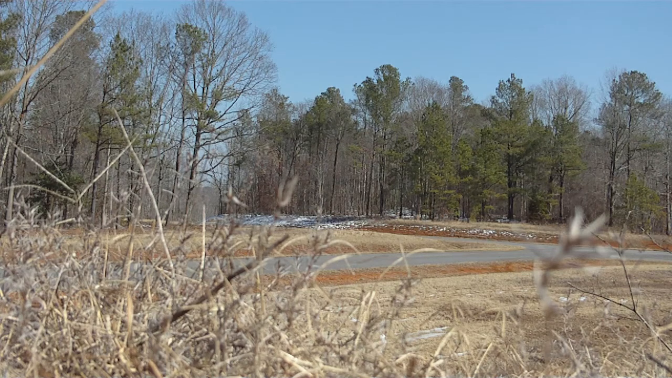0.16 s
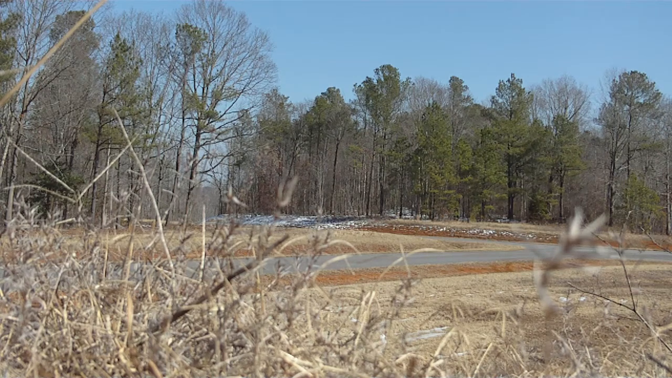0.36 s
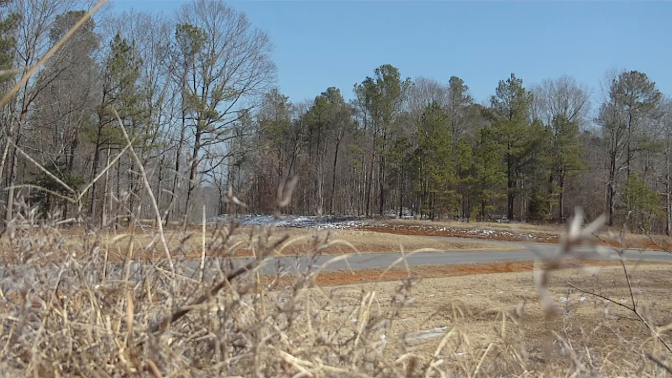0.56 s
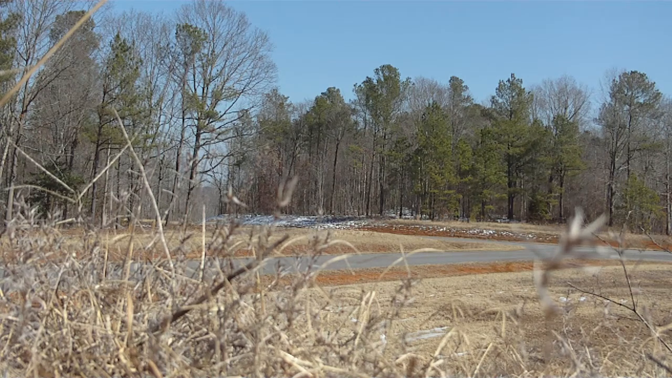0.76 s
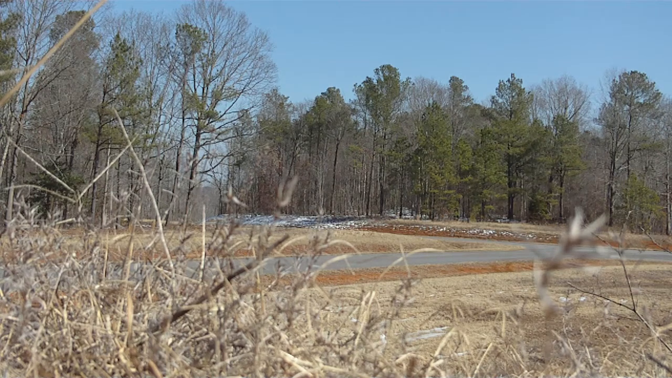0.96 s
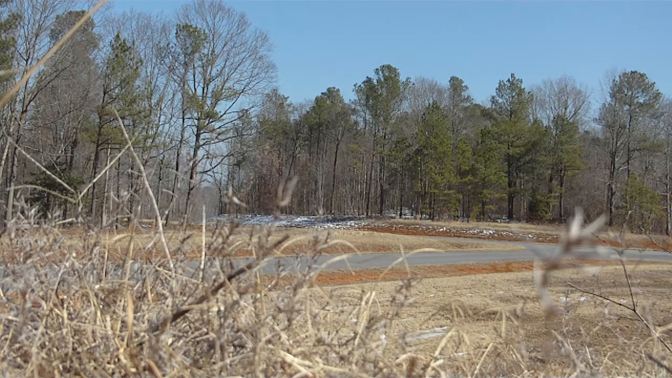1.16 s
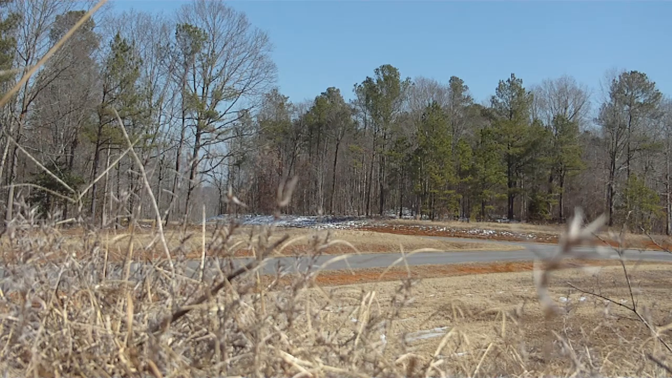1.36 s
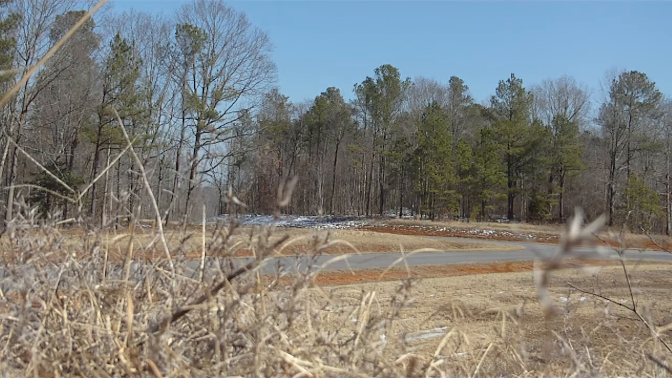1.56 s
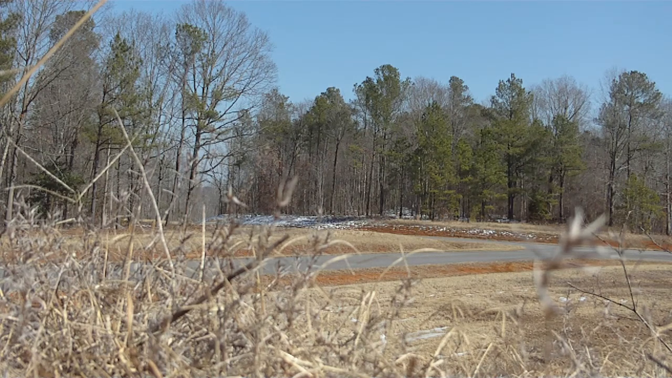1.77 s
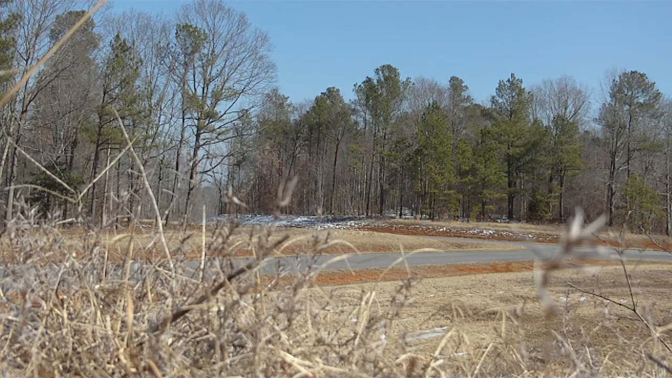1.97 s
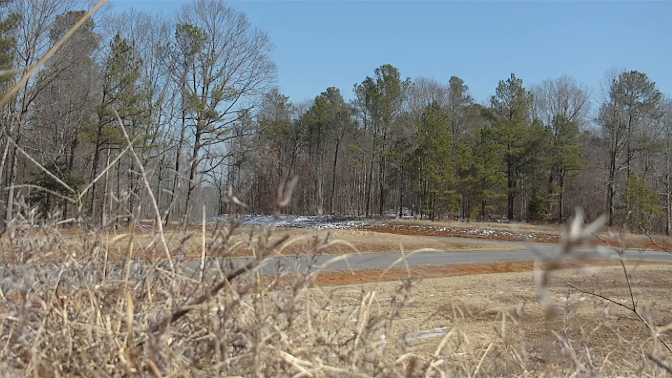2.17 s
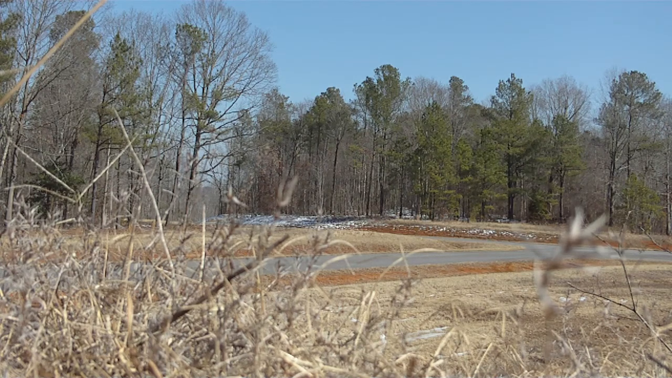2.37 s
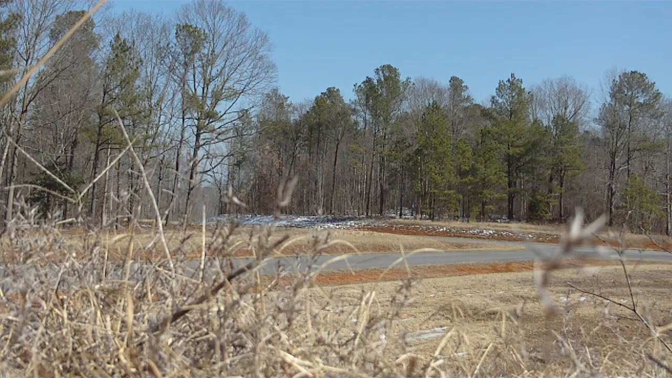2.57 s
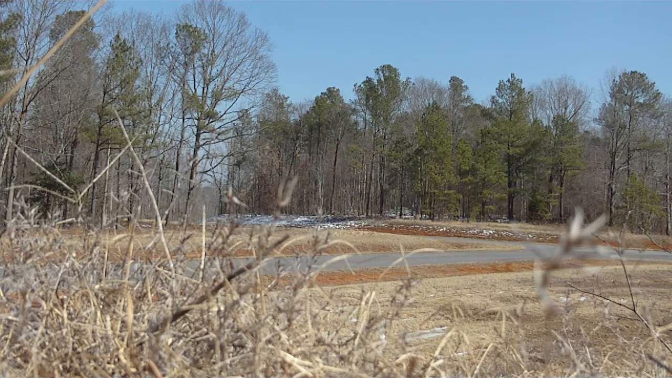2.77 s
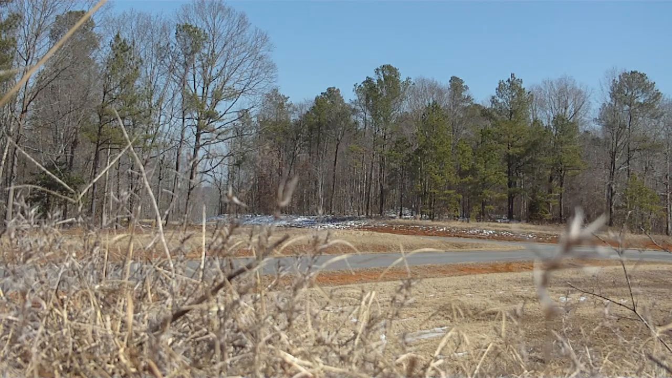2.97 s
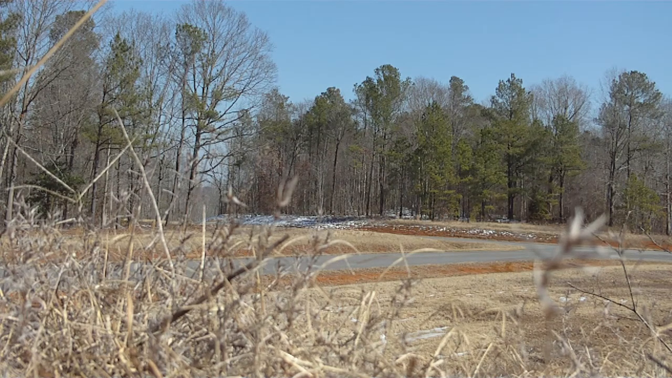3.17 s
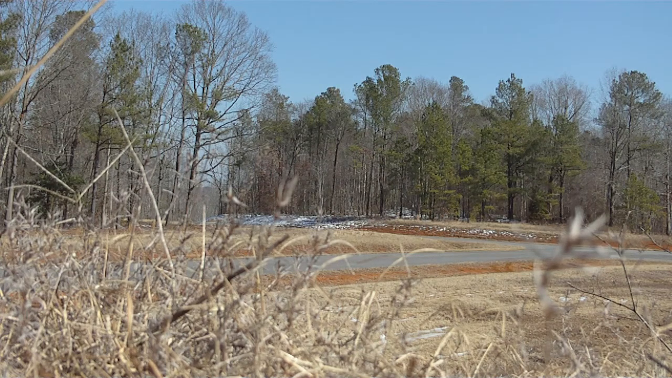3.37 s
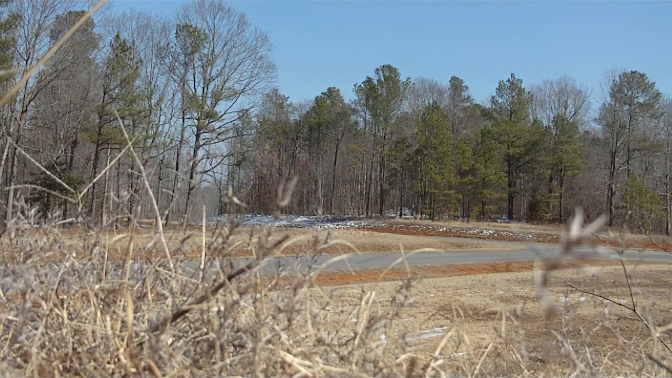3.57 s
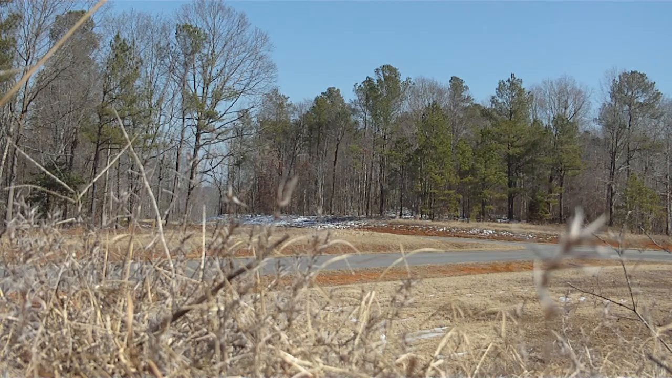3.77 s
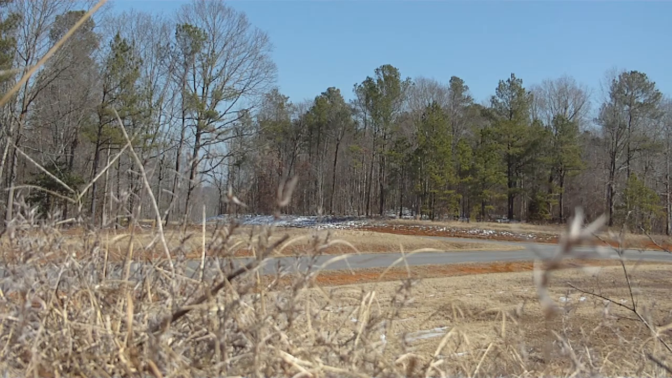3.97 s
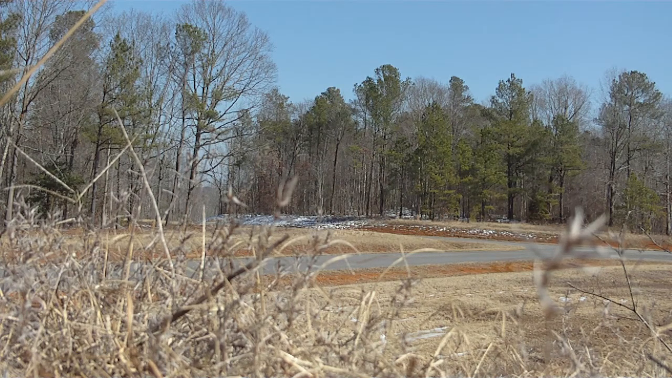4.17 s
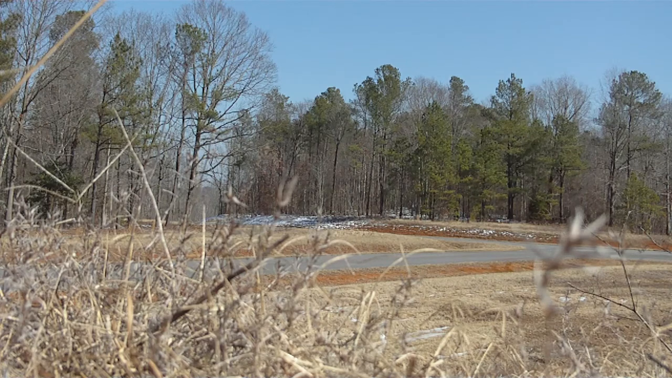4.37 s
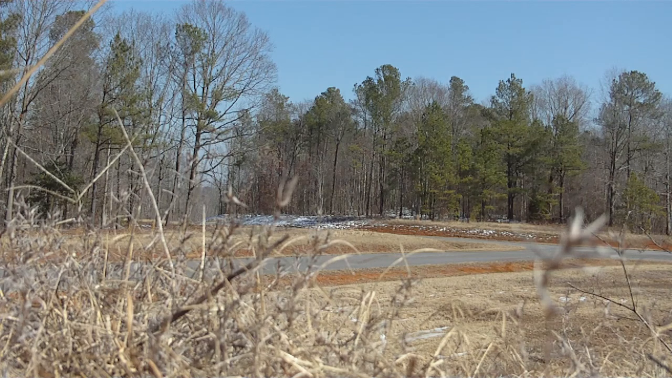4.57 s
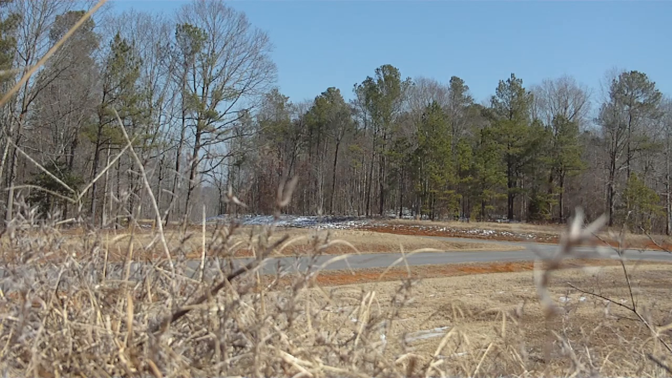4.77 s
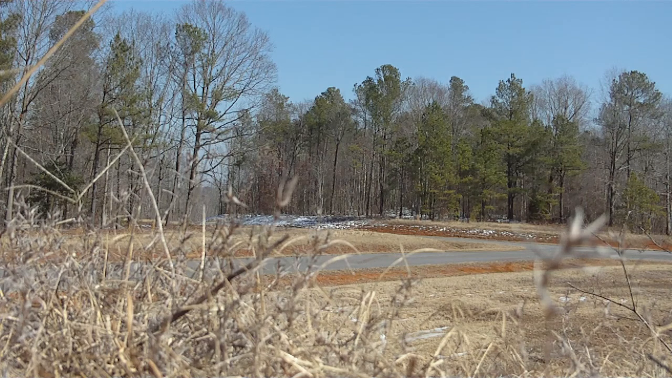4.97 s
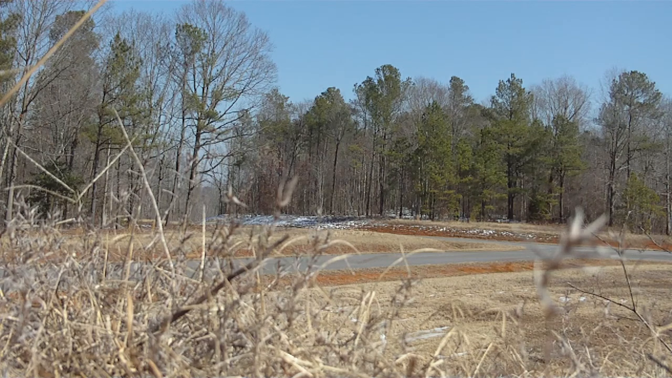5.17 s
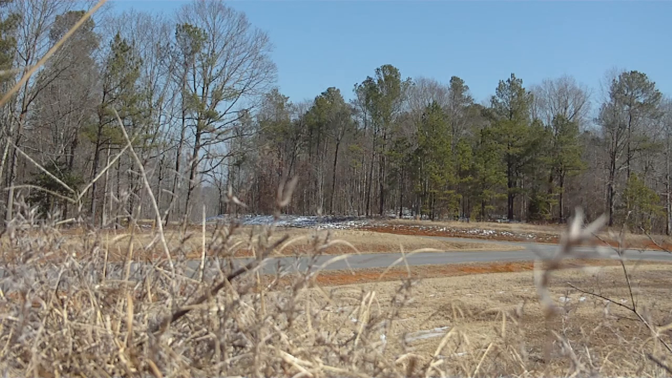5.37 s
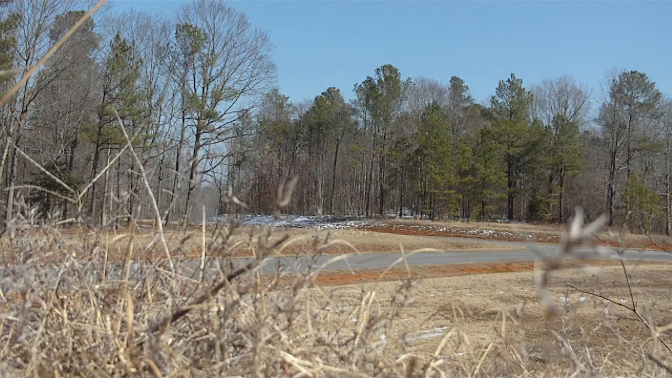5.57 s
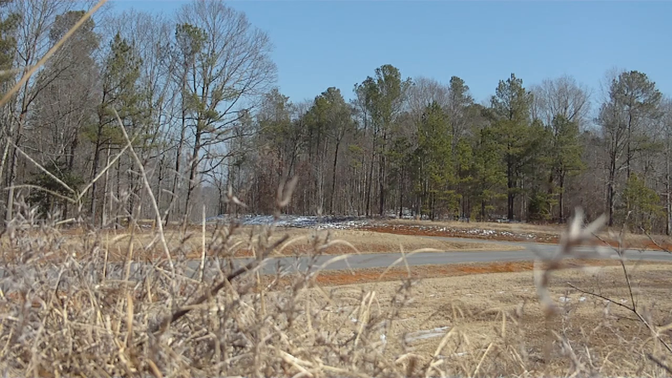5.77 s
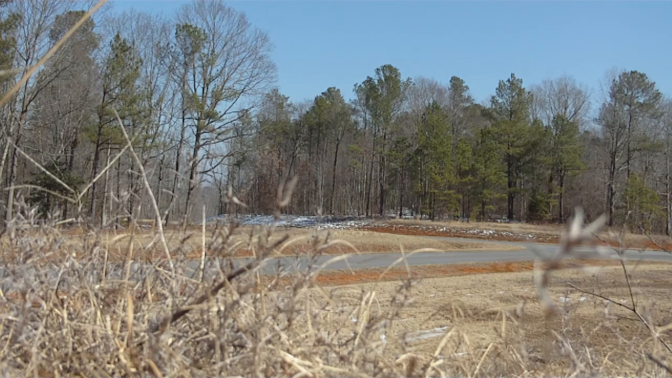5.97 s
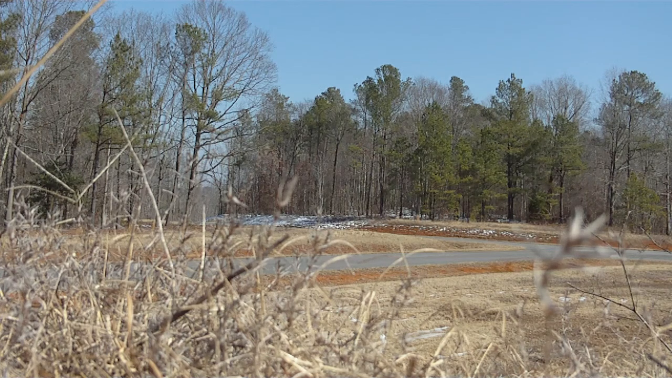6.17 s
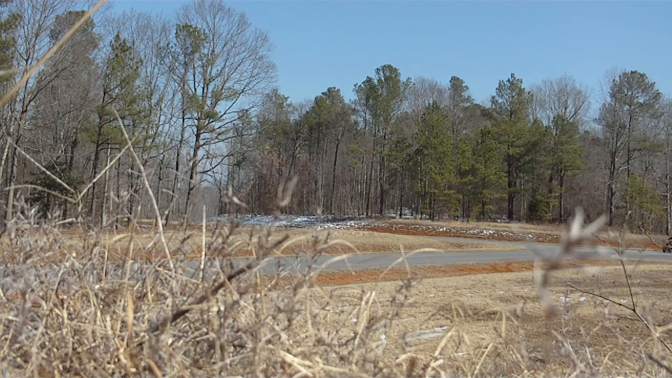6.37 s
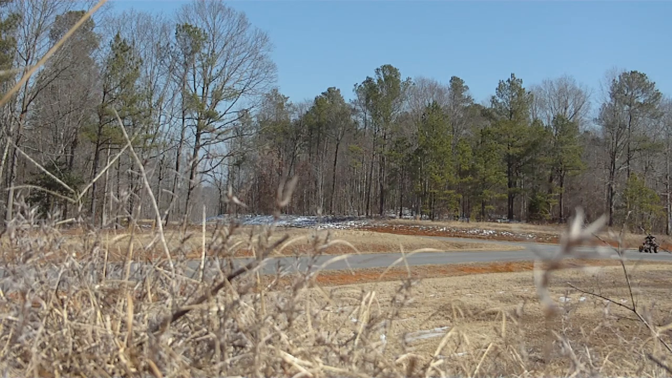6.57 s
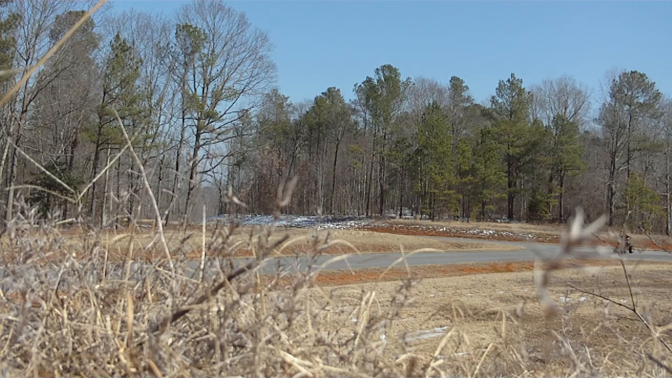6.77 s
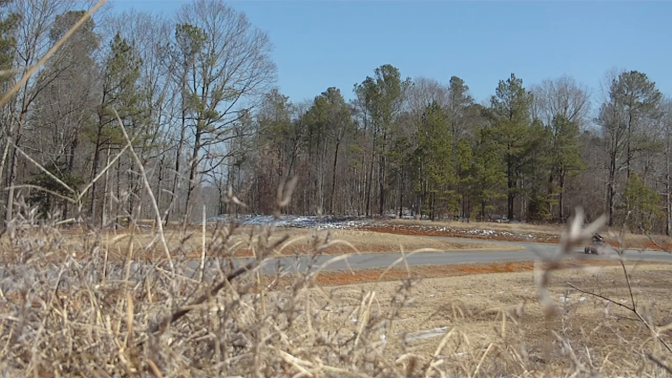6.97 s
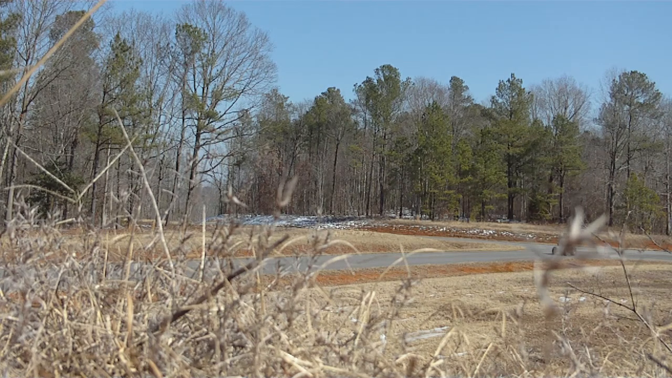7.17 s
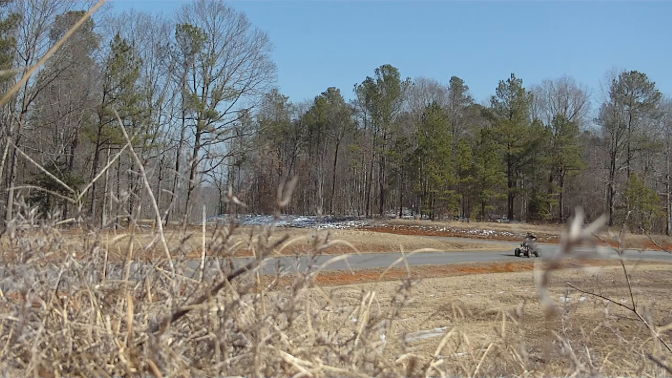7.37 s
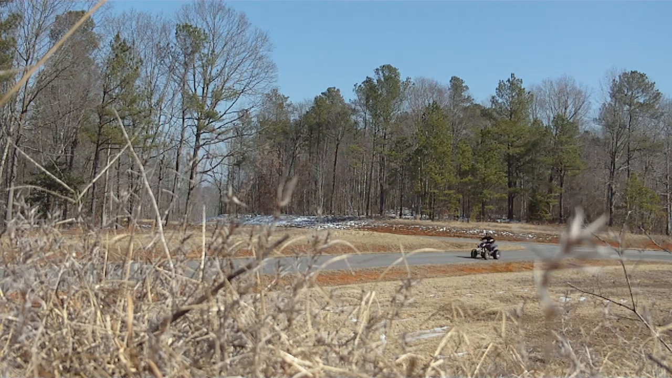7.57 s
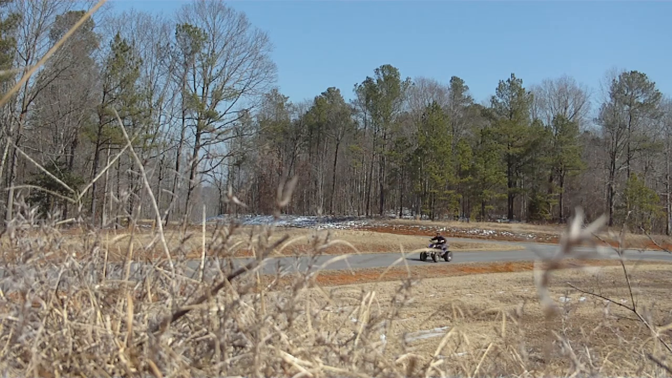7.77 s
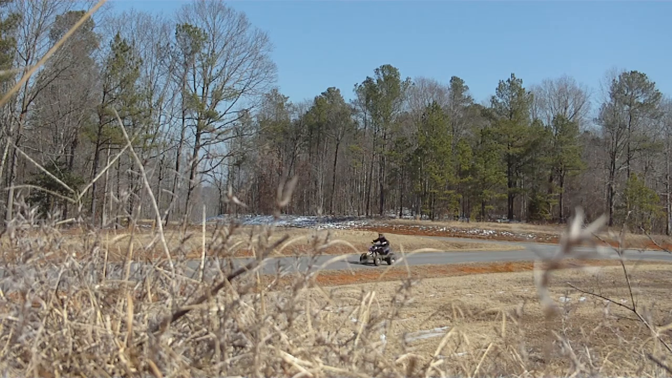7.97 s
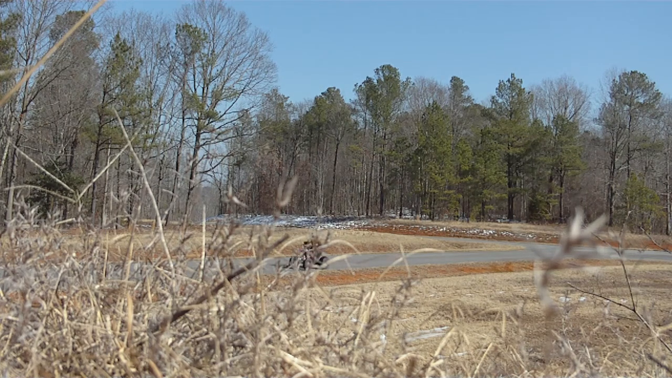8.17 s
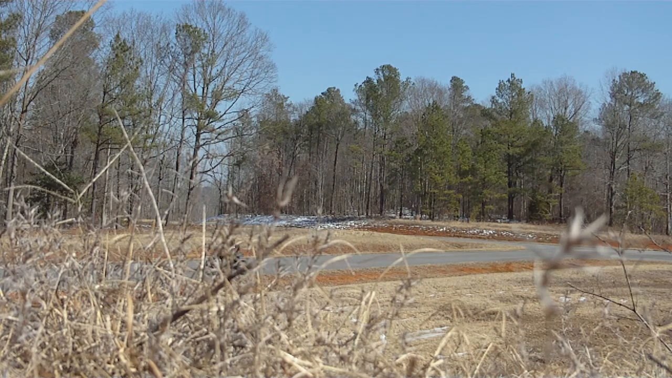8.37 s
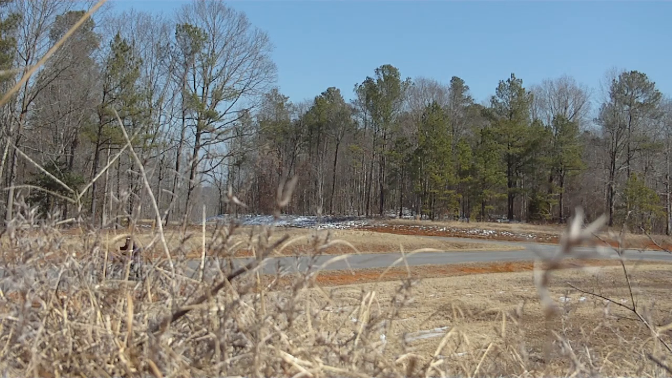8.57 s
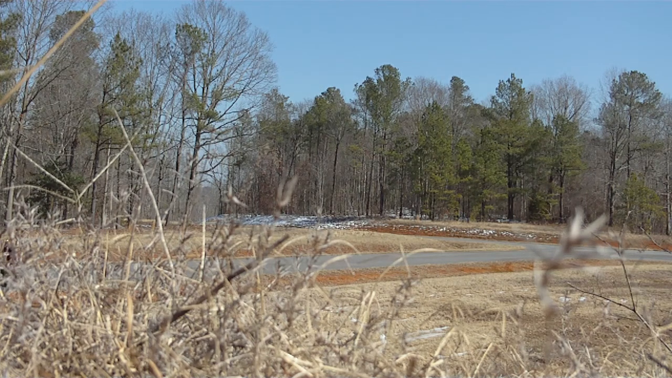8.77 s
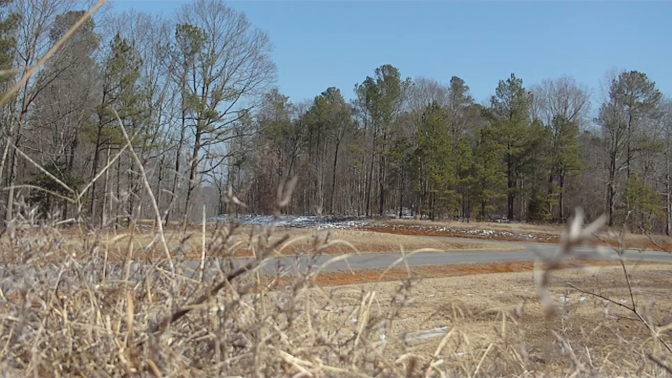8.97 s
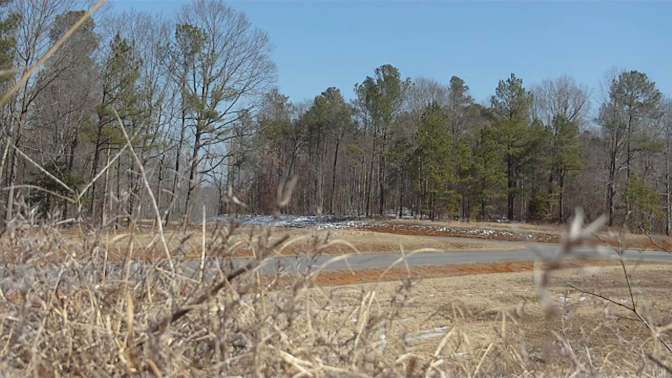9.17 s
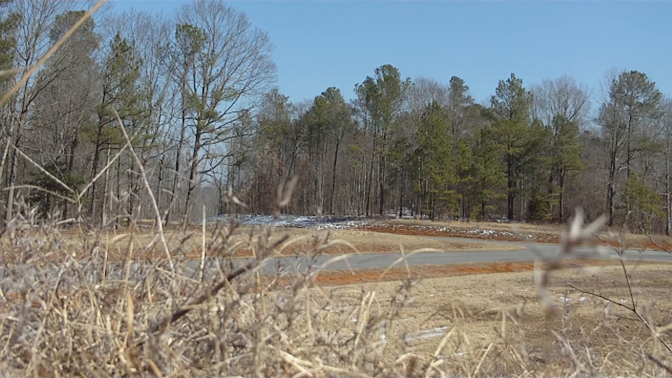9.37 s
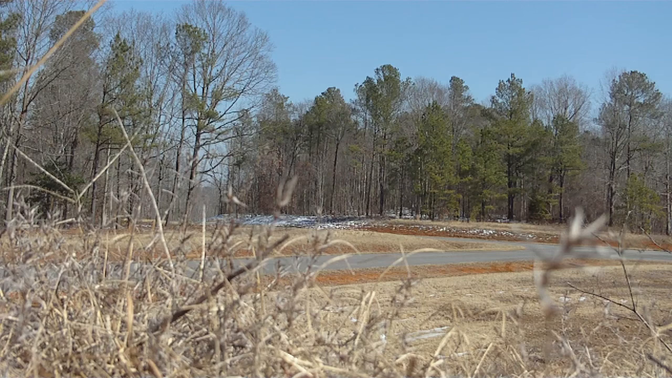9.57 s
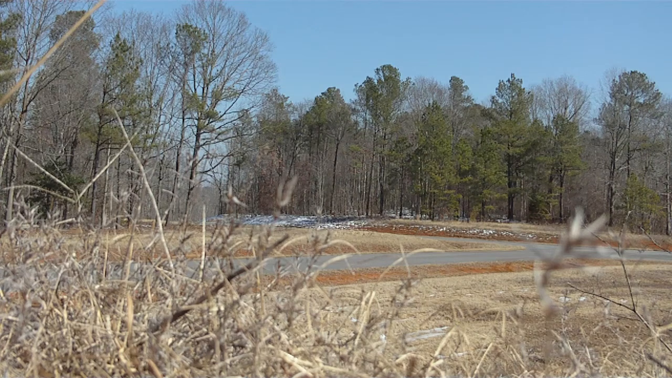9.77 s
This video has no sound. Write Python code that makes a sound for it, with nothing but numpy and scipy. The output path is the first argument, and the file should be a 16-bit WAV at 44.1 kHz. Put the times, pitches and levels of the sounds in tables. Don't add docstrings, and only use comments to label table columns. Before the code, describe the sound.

Distant quad engine buzz shifts up early, steadily grows with knobbly tyre hum and clatter, then passes loudly and drops in pitch at the end.

```python
import sys
import numpy as np
from scipy import signal
from scipy.fft import rfft, irfft
from scipy.io import wavfile

SR = 44100
rng = np.random.default_rng(int(sys.argv[2]) if len(sys.argv) > 2 else 0)


def rack_gain(trim_db):
    fader = np.asarray(trim_db, float)
    return 10 ** (fader / 20)


def generate_wav(signal):
    frames = np.transpose(np.atleast_2d(signal))
    scaled = np.clip(frames, -1, 1) * 32767
    pcm = np.round(scaled).astype(np.int16)
    wavfile.write(sys.argv[1], SR, pcm)


N = 433062

# f/Hz, level/dB per Hz
AIR_COLOUR = [(10, -32), (22, 3), (40, -1), (65, -1.5), (110, 0), (200, -13), (400, -54.5)]
AIR_DB = -41
# t/s, level/dB, length/s
GUSTS = [
    (1.5, -1, 0.45),
    (4.2, 4, .3),
    (4.85, -3, .12),
    (5.2, 8, .15),
    (5.75, 9, .2),
    (7.85, -5, .25),
    (8.5, -5, .3),
]
# start f/Hz, end f/Hz, start level/dB, end level/dB
DRONES = [
    (61.6, 56, -39.5, -45.5),
    (70.9, 67, -37.5, -48.5),
    (102.5, 77, -46, -45),
]
# t/s, f/Hz, level/dB
GEAR_HUM = [
    (0, 270, -43),
    (.6, 277, -38.5),
    (.8, 268, -41.5),
    (1.1, 236, -60),
]
# f/Hz, level/dB
WHINES = [(7865, -76), (11090, -69.5)]
LEFT_DB = -9.1
HISS_LEFT_DB, HISS_RIGHT_DB = -54, -57.5

# t/s, level/dB
NEARNESS = [(0, -16), (1.0, -15), (1.8, -14), (2.6, -12.5), (3.2, -11.5), (4.2, -10.5), (5.0, -7.5),
            (5.5, -4.5), (6.1, -4), (6.7, -2), (7.3, -1), (7.9, -0.5), (8.3, 0.4), (8.8, -0.2)]
# t/s, shut/0-1
THROTTLE = [(0, 0), (.42, 0), (.5, 0.6), (.57, 1.2), (.63, 0), (.7, 0.14), (8.82, 0.02), (8.87, 0.53),
            (9.04, 1.05), (9.2, 0.65), (9.44, 0.61), (9.58, .2), (9.82, 0.55)]
# t/s, uneven firing/0-1, close colour/0-1
ENGINE_STATE = [(0, 0.42, 0.05), (4.5, 0.37, 0.14), (6.0, 0.08, 0.01), (8.1, 0.18, 0.15), (8.4, 0.26, 0.25),
                (8.83, 0.3, 0.4), (8.87, 0.3, 0.56), (9.35, .6, 0.9), (9.82, 0.3, 1)]
# t/s, level/dB
SCREEN = [(0, -29), (4.6, -28), (5.95, -22), (6.1, -3), (6.2, -6.5), (6.4, -10.5), (6.75, -5.5), (7.05, 2),
          (7.22, -2.5), (7.4, -1), (7.62, 2.5), (7.8, -1.5), (8.05, -1.5), (8.4, -4.5), (8.8, -1.2)]
FINS_SCREENED = 0.026
UPSHIFT_S, UPSHIFT_LASTS_S = .74, 0.2
LOW_GEAR_SECOND_DB, LOW_GEAR_TREAD_DB = -13.5, -23
ABREAST_S, ABREAST_TAKES_S = 8.845, 0.043
AWAY_S, AWAY_TAKES_S = 9.29, 0.34
# t/s, level/dB,
# length/s
RUTS = [(0.677, 3, 0.026), (0.978, 2, 0.061), (5.55, -2, 0.15), (7.11, 1.5, 0.041), (7.6, -1, 0.047),
        (7.99, 3, 0.034), (8.018, -5.5, .015), (8.26, -1, .03), (8.82, -1, 0.025), (8.9, 0, 0.028),
        (9.16, 1.5, 0.017), (9.234, 2.5, 0.031), (9.52, 3, 0.15)]

CHAIN_LAYER = (-50, -0.27, -2.8, 8.5, -2)
# f/Hz, level/dB per Hz
HISS_FAR = [(2650, -9), (4500, 0.5), (5670, -4), (6110, -10), (6490, 5), (7510, 4.5), (8560, -8),
            (9510, -7.5), (11000, -19), (14300, -48), (22000, -120)]
# f/Hz, level/dB per Hz
HISS_CLOSE = [(2650, -45), (4500, -10), (4740, -14), (5320, 2.5), (5570, 5.5), (6420, -7.5), (7650, 0),
              (8500, -15), (11000, -21), (14300, -54), (22000, -120)]
HISS_LEAD = 1.5

# t/s, f/Hz
TREAD_RATE = [(0, 222.8), (1.4, 227), (2.2, 224), (3.4, 228.9), (3.8, 228.2), (4.3, 229.4), (5.0, 231.7),
              (5.6, 236.4), (5.8, 235.6), (6.05, 232.0), (6.8, 238.1), (7.55, 241), (8.55, 245.6),
              (8.8, 244.4), (8.9, 238.6), (9.2, 226.7), (9.82, 207.6)]
REAR_RATIO = 1.46
FRONT_TREAD = [
    (-34, 0.35, 0.1, 5.4, -1.5),
    (-33, 2.4, 0.1, 1.8, 1),
    (-36.5, 1.39, 0.1, 9.4, 2.5),
]
REAR_TREAD = [
    (-46.5, 1.48, 0.1, 17.2, -3.5),
    (-39.5, 1.9, 0.1, 8.7, 2.5),
    (-60.5, 2.4, 0.1, 2.5, 20),
]
# f/Hz, width/Hz, lift/dB
TYRE_WALL = [(232, 4.2, 2.5), (303, 5.7, 10), (337.7, 3.6, 11), (411, 8, 5), (466.6, 6.5, 5),
             (491, 4.6, 4.5), (659.3, 26, 6), (721, 16.6, 3)]
# t/s, level/dB, length/s
SURFACE = [(1.1, -1.5, 0.26), (2.15, -2, 0.17), (2.9, -2.5, .3), (4.9, -1.5, .3), (5.75, 2.5, .25),
           (6.7, -1, .1), (7.15, 2.5, .12), (7.5, 3, .2), (8.0, 1, .1), (8.5, -3.5, 0.27), (8.79, -6, 0.08),
           (9.36, -1.5, 0.086), (9.5, 1.5, 0.04)]
SONG_FEELS_SURFACE = 0.73
ROAD_LAYER = (-41.5, 0.82, 1, 7, 2.5)
# f/Hz, level/dB per Hz
ROAR_FAR = [(25, -29), (60, -19), (110, 1.5), (185, 1), (300, -0.5), (450, 4), (600, -1), (730, -3),
            (850, -8), (1100, -16.5), (1600, -48)]
# f/Hz, level/dB per Hz
ROAR_CLOSE = [(25, 2), (60, -8), (110, 3), (185, -7), (300, 6.5), (450, 5), (600, 1.5), (730, 6.5),
              (850, -7.5), (1100, -10), (1600, -60)]

GEAR_TEETH = 11, 16, 18, 22, 18, 20, 20, 13, 14, 16
# t/s, level/dB, length/s
GEAR_RINGS = [(12, -34, 0.07), (8.94, -36, .06), (9.03, -33, 0.051), (9.0, -34, 0.046), (9.2, -35, .06),
              (9.2, -32, 0.062), (9.36, -32, 0.073), (9.35, -30.5, .07), (9.44, -33, .09),
              (9.66, -34.5, 0.22)]
CASES_LAYER = (-39, 0.92, -0.8, 7, -4.5)
# f/Hz, level/dB per Hz
CASES_FAR = [(500, -37), (850, -9.5), (1030, -1), (1200, 7), (1560, 7), (1660, 6.5), (2000, -7.5),
             (2600, -20), (4400, -120)]
# f/Hz, level/dB per Hz
CASES_CLOSE = [(500, -22), (850, -9), (1060, -12), (1370, 0.5), (1520, 0), (1650, 5), (2000, -9),
               (2600, -47), (4400, -120)]
FINS_LAYER = (-37, 1.33, -0.4, 6.5, -9.5)
# f/Hz, level/dB per Hz
FINS_FAR = [(1120, -65), (1900, -1), (2410, 6), (2970, -1), (3350, -15.5), (3970, -11.5), (4600, -33),
            (5980, -54), (10100, -120)]
# f/Hz, level/dB per Hz
FINS_CLOSE = [(1120, -47), (1900, -70.5), (2150, 2.5), (2370, 10.5), (2700, 2), (3300, 1.5), (4600, -18.5),
              (5980, -63), (10100, -120)]
# t/s, level/dB
KNOCK_SHARE = [(0, -17), (4.5, -14), (6.2, -10), (8.8, -8.5), (8.9, -8), (9.82, -6)]

# t/s, f/Hz
FIRING = [(0, 150.3), (.57, 152.4), (.68, 160.9), (.82, 135.8), (.92, 129.4), (1.05, 127.6), (5.0, 129.6),
          (5.35, 130.8), (5.74, 136.9), (6.1, 134.2), (6.55, 131.9), (7.43, 135.4), (8.5, 137.3),
          (8.82, 136.3), (8.96, 132.2), (9.11, 125.2), (9.5, 117.0), (9.82, 108.2)]
# t/s, jump/Hz, settling/s
FLARES = [
    (6.2, 1.2, .1),
    (7.46, 3.9, .13),
    (9.14, 6, .25),
    (9.3, 3, .08),
]
EXHAUST_ORDERS = [
    (-17, 0.97, -15.5, 2.2, -1.5),
    (-21, 0.99, 1.5, -8, 2.5),
    (-26, 1.69, -16, -5, 8.5),
    (-35.5, 1.09, -13, -6, 2.5),
]
# f/Hz, width/Hz, lift/dB
PIPE = [(264.3, 8.8, 4), (407, 4.9, 2), (532.8, 14, 7.5)]


def rms_one(x):
    return x / np.sqrt(np.mean(np.abs(x) ** 2) + 1e-20)


def in_time(rows):
    s, *columns = np.transpose(rows)
    return [np.interp(np.arange(N) / SR, s, c) for c in columns]


def at_hz(points, hz):
    point_hz, point_db = np.transpose(points)
    return np.interp(np.log(hz + 1e-9), np.log(point_hz), point_db)


def ramp(start_s, takes_s):
    return np.clip((np.arange(N) / SR - start_s) / max(takes_s, .005), 0, 1)


def bells_db(rows):
    t = np.arange(N) / SR
    return sum(db * np.exp(-((t - s) / max(length, .005)) ** 2) for s, db, length in rows)


def lift_db(resonances, hz):
    return sum(db * np.exp(-((hz - centre) / max(width, 1)) ** 2) for centre, width, db in resonances)


def level_db(layer):
    near_db, share, shut_db, abreast_db, away_db = layer
    out = near_db + share * in_time(NEARNESS)[0] + shut_db * in_time(THROTTLE)[0]
    return out + abreast_db * ramp(ABREAST_S, ABREAST_TAKES_S) + away_db * ramp(AWAY_S, AWAY_TAKES_S)


def drift(rate):
    r = np.exp(-80 * np.pi * max(rate, .05) / SR)
    slow = signal.lfilter([1], [1, -2 * r, r * r], rng.standard_normal(N // 40 + 2002))[2000:]
    return np.interp(np.arange(N) / 40, np.arange(len(slow)), rms_one(slow))


def turns(hz):
    return 2 * np.pi * np.cumsum(hz) / SR


def partial(phase, rough, rate):
    rough = np.clip(rough, 0, 1)
    wander = (drift(rate) + 1j * drift(rate)) / np.sqrt(2)
    start = np.exp(2j * np.pi * rng.random())
    strength = np.sqrt(1 - rough) + np.sqrt(rough) * wander
    return np.sqrt(2) * np.real(strength * start * np.exp(1j * phase))


def coloured(x, far, close, closeness):
    hz, wide = np.fft.rfftfreq(N, 1 / SR), rfft(x)
    a, b = [rms_one(irfft(wide * rack_gain(at_hz(shape, hz)), N)) for shape in (far, close)]
    mix = np.clip(closeness, 0, 1)
    return ((1 - mix) * a + mix * b) / np.sqrt(1 - mix * (1 - mix))


def open_air():
    air_db = AIR_DB + np.linspace(2.5, -5.0, N) + bells_db(GUSTS) + 0.85 * drift(6.0)
    return rack_gain(air_db) * coloured(rng.standard_normal(N), AIR_COLOUR, AIR_COLOUR, 0)


def far_machinery():
    out = np.zeros(N)
    for hz, end_hz, db, end_db in DRONES:
        tone = partial(turns(np.linspace(hz, end_hz, N)), .12, rate=1.5)
        out = out + rack_gain(np.linspace(db, end_db, N)) * tone
    return out


def low_gear_hum():
    hum_hz, hum_db = in_time(GEAR_HUM)
    return rack_gain(hum_db) * partial(turns(hum_hz), .8, rate=9)


def chain_hiss(rate_hz, hiss_db, close):
    pulse = 1 + 0.16 * np.cos(turns(rate_hz))
    flutter_db = 1.65 * drift(1.5) + 1.3 * drift(30)
    noise = rng.standard_normal(N) * pulse * rack_gain(flutter_db)
    return rack_gain(hiss_db) * coloured(noise, HISS_FAR, HISS_CLOSE, HISS_LEAD * close)


def tread_song(wheel, levels_db, blur):
    return sum(rack_gain(db) * partial((k + 1) * wheel, blur, rate=6.5 + 3.3 * k) for k, db in enumerate(levels_db))


def tyre_roar(roar_db, close):
    noise = rng.standard_normal(N) * rack_gain(0.67 * drift(3.7))
    return rack_gain(roar_db + 10.5) * coloured(noise, ROAR_FAR, ROAR_CLOSE, close)


def tyres(roar_db, close, low_gear):
    knob_hz, = in_time(TREAD_RATE)
    wheel = turns(knob_hz)
    first, second, third = [level_db(row) + lift_db(TYRE_WALL, (k + 1) * knob_hz)
                            for k, row in enumerate(FRONT_TREAD)]
    front_db = [first + LOW_GEAR_TREAD_DB * low_gear, second, third, third - 19]
    rear_db = [level_db(row) + lift_db(TYRE_WALL, (k + 1) * REAR_RATIO * knob_hz)
               for k, row in enumerate(REAR_TREAD)]
    song = tread_song(wheel, front_db, blur=0.49) + tread_song(REAR_RATIO * wheel, rear_db, blur=0.3)
    return rack_gain(SONG_FEELS_SURFACE * bells_db(SURFACE)) * song + tyre_roar(roar_db, close)


def gears(rate_hz):
    t, crank = np.arange(N) / SR, turns(rate_hz)
    out = np.zeros(N)
    for teeth, (s, db, length) in zip(GEAR_TEETH, GEAR_RINGS):
        swell = np.exp(-((t - s) / max(length, .02)) ** 2)
        out = out + rack_gain(db) * swell * partial(teeth * crank, .15, rate=12)
    return out


def knock_order(k, crank, close):
    swell_db = (1 + 1.2 * close) * drift(2) - 1.5 * max(k - 22, 0)
    return rack_gain(swell_db) * partial(k * crank, .4, rate=8)


def clatter(rate_hz, cases_db, fins_db, close):
    crank = turns(rate_hz)
    pattern = sum(knock_order(k, crank, close) for k in range(9, 30))
    puffs = rng.standard_normal(N) * (1 + 0.071 * np.cos(crank)) * rack_gain(0.29 * drift(23))
    share = rack_gain(in_time(KNOCK_SHARE)[0])
    knocks = (share * rms_one(pattern) + rms_one(puffs)) / np.sqrt(1 + share ** 2)
    cases = rack_gain(cases_db) * coloured(knocks, CASES_FAR, CASES_CLOSE, close)
    fins = rack_gain(fins_db) * coloured(knocks, FINS_FAR, FINS_CLOSE, close)
    return cases + fins


def firing_rate():
    t = np.arange(N) / SR
    flares = sum(jump * ramp(s - .02, .03) * np.exp(-np.maximum(t - s, 0) / settle)
                 for s, jump, settle in FLARES)
    return in_time(FIRING)[0] + flares


def exhaust(rate_hz, uneven, low_gear):
    first, second, third, fourth = [level_db(row) + lift_db(PIPE, (k + 1) * rate_hz)
                                    for k, row in enumerate(EXHAUST_ORDERS)]
    weak_db = LOW_GEAR_SECOND_DB * low_gear
    orders_db = [first, second + weak_db, third, fourth + weak_db, third - 16]
    crank = turns(rate_hz)
    return sum(rack_gain(db) * partial((k + 1) * crank, uneven * (0.049 + 0.094 * k), rate=10.5)
               for k, db in enumerate(orders_db))


def scene():
    rate_hz, low_gear = firing_rate(), 1 - ramp(UPSHIFT_S, UPSHIFT_LASTS_S)
    uneven, close = in_time(ENGINE_STATE)
    screen_db, = in_time(SCREEN)
    shaken = ROAD_LAYER, CASES_LAYER, FINS_LAYER, CHAIN_LAYER
    roar_db, cases_db, fins_db, hiss_db = [level_db(row) + bells_db(RUTS) for row in shaken]
    mix = open_air() + far_machinery() + low_gear_hum()
    mix = mix + chain_hiss(rate_hz, hiss_db + screen_db, close)
    mix = mix + tyres(roar_db + bells_db(SURFACE), close, low_gear)
    mix = mix + gears(rate_hz)
    mix = mix + clatter(rate_hz, cases_db, fins_db + FINS_SCREENED * screen_db, close)
    mix = mix + exhaust(rate_hz, uneven, low_gear)
    return np.tile(mix, (2, 1))


def roll_off(x):
    return signal.sosfilt(signal.butter(12, 15360, fs=SR, output="sos"), x)


def record(dry):
    whine = sum(rack_gain(db) * np.sqrt(2) * np.sin(turns(np.full(N, hz))) for hz, db in WHINES)
    line_hiss = rack_gain(-59.0) * signal.lfilter([1], [1, -.4], rng.standard_normal(N))
    gains = np.array([[rack_gain(LEFT_DB)], [1]]) * 2 / (1 + rack_gain(LEFT_DB))
    input_hiss = rack_gain(np.array([[HISS_LEFT_DB], [HISS_RIGHT_DB]]) - 8) * rng.standard_normal((2, N))
    return roll_off((dry + whine + line_hiss) * gains + input_hiss)


dry = scene()
out = record(dry)
generate_wav(out)
```